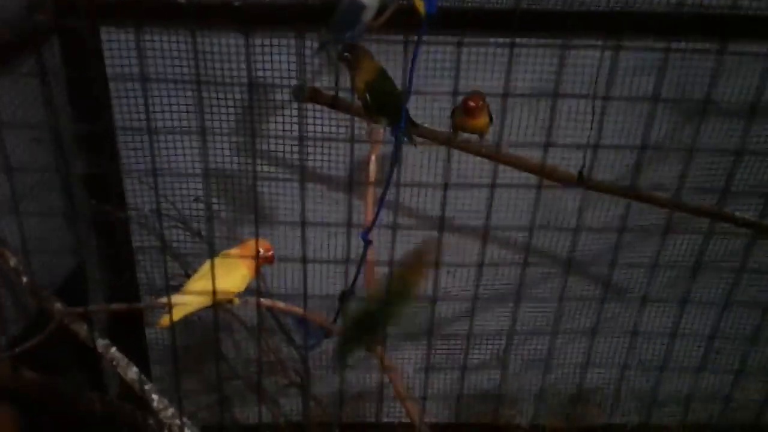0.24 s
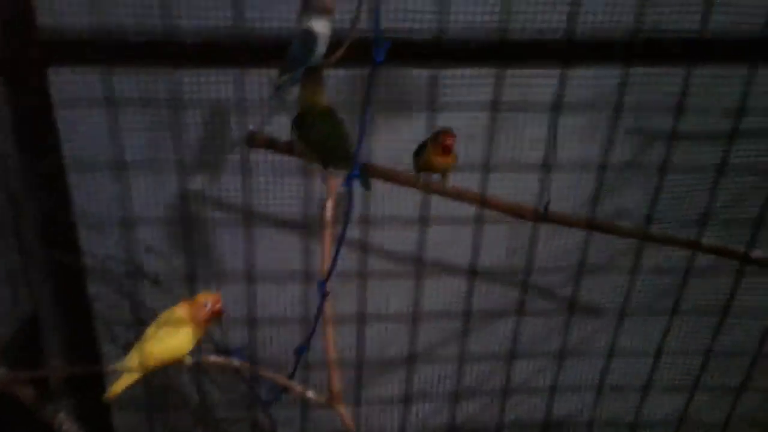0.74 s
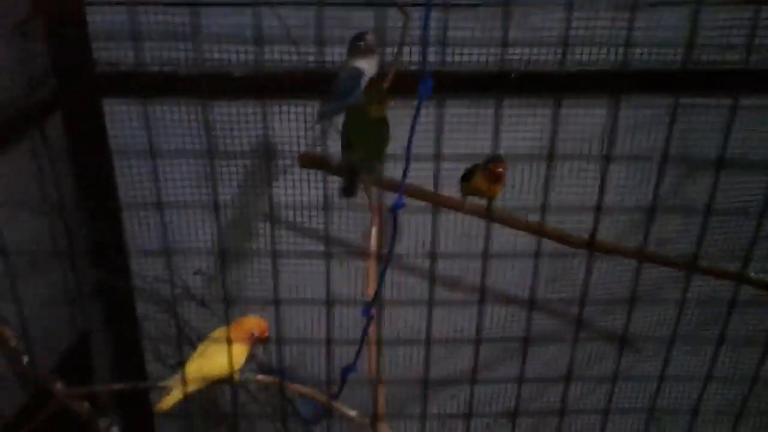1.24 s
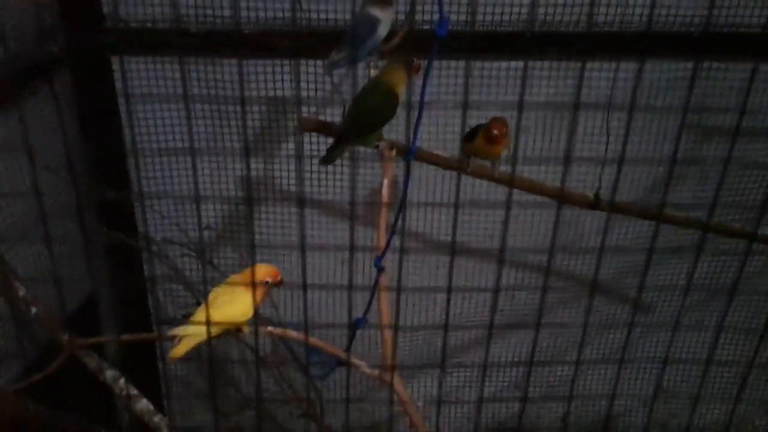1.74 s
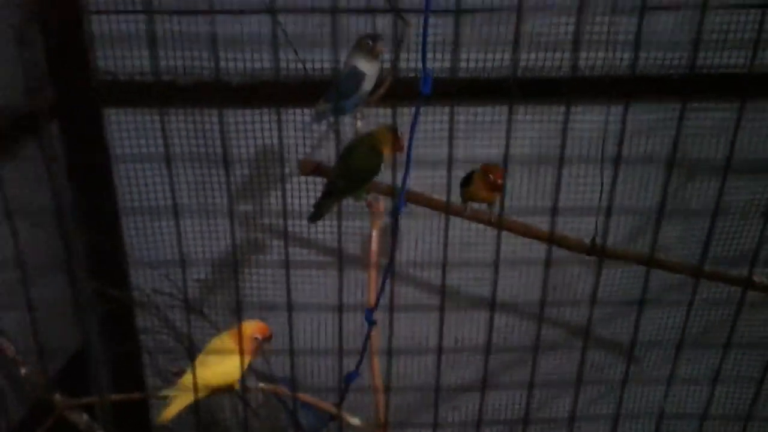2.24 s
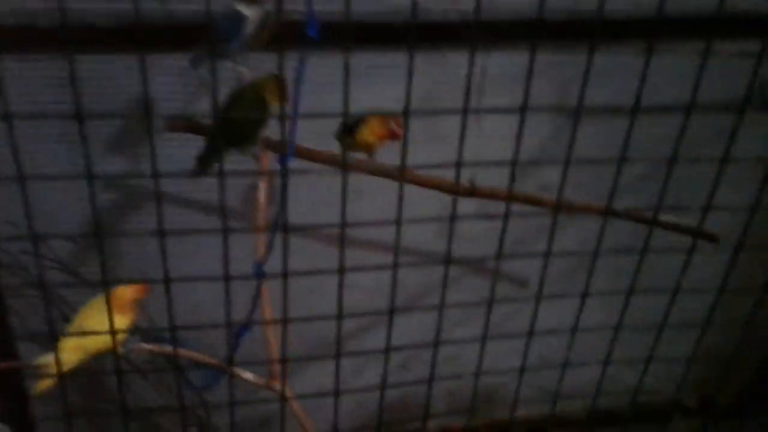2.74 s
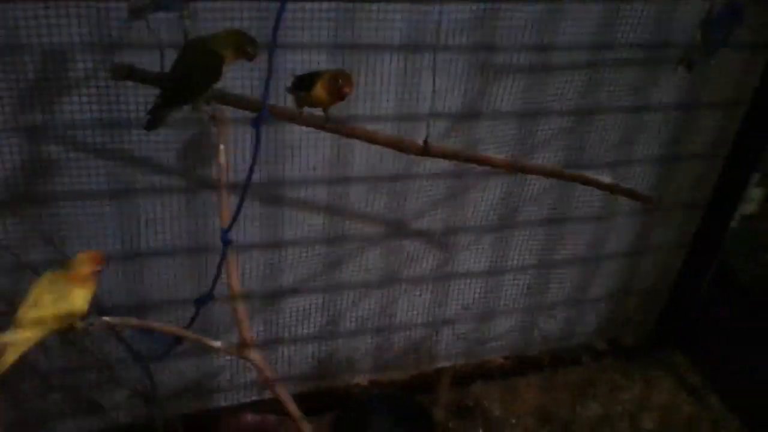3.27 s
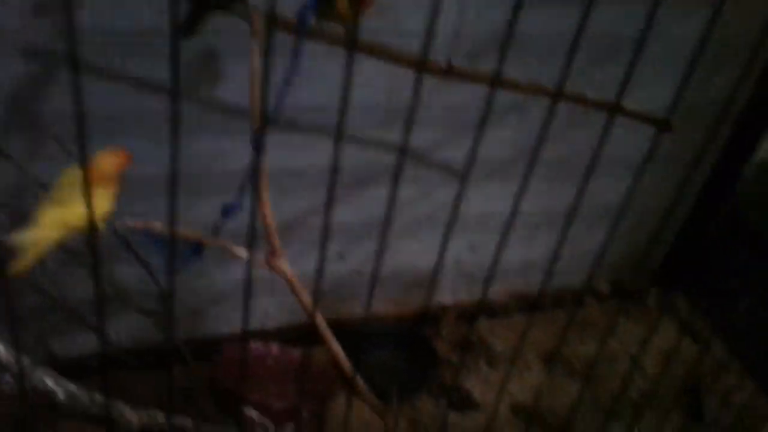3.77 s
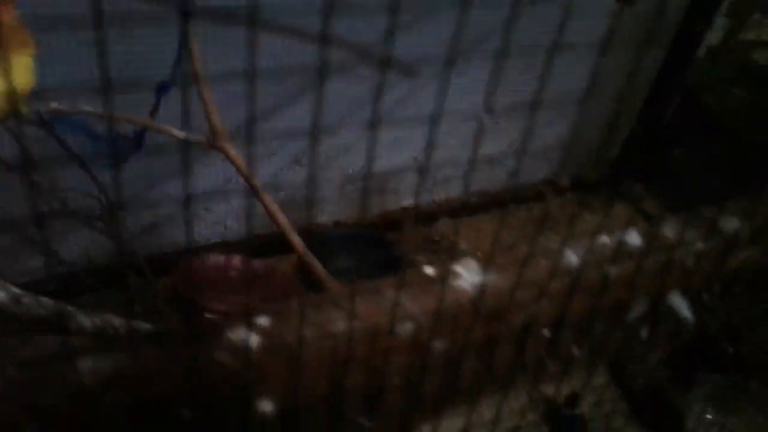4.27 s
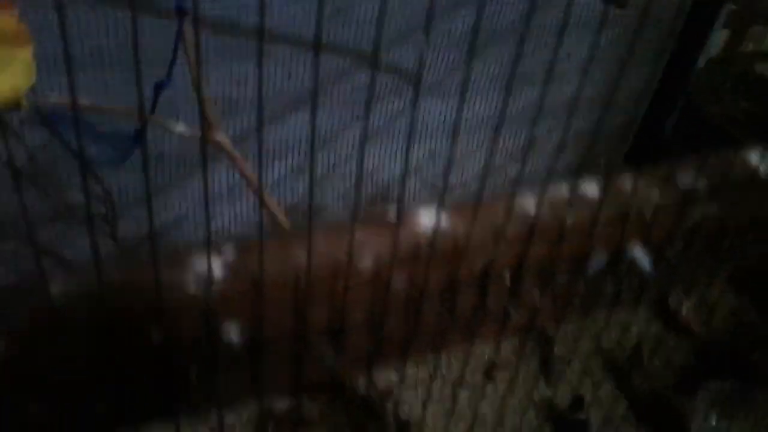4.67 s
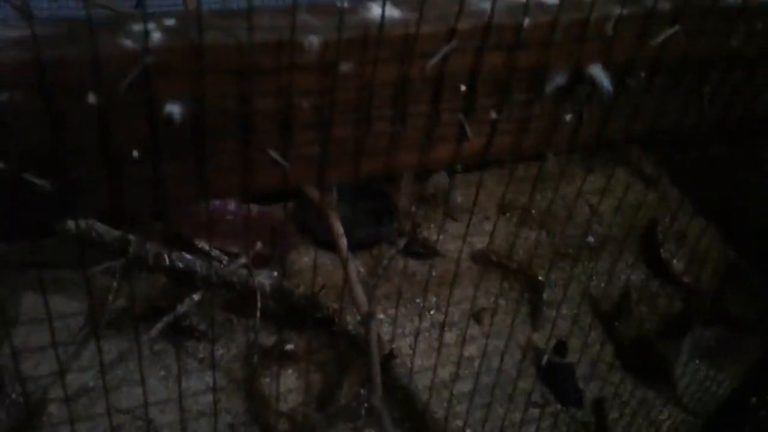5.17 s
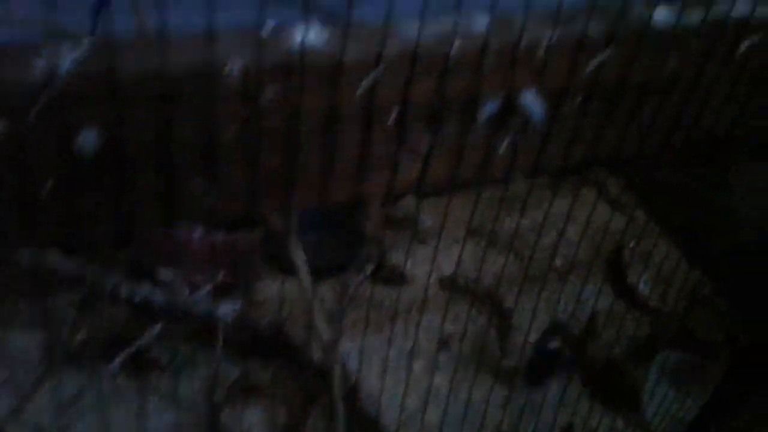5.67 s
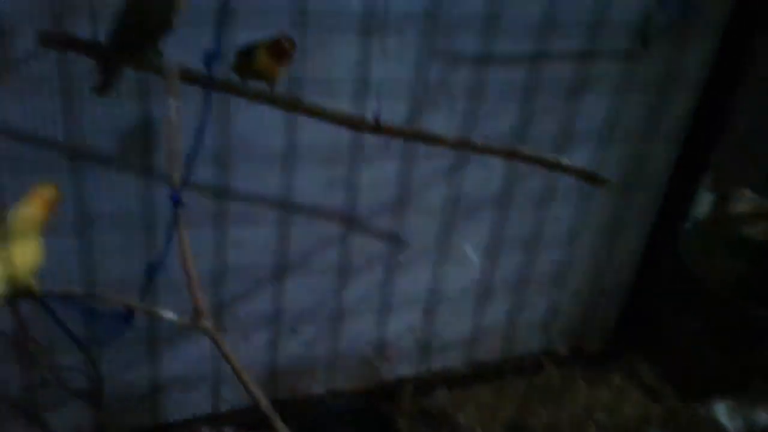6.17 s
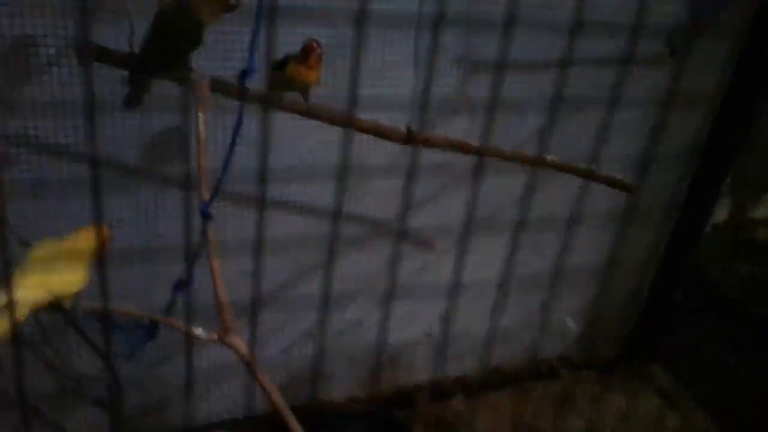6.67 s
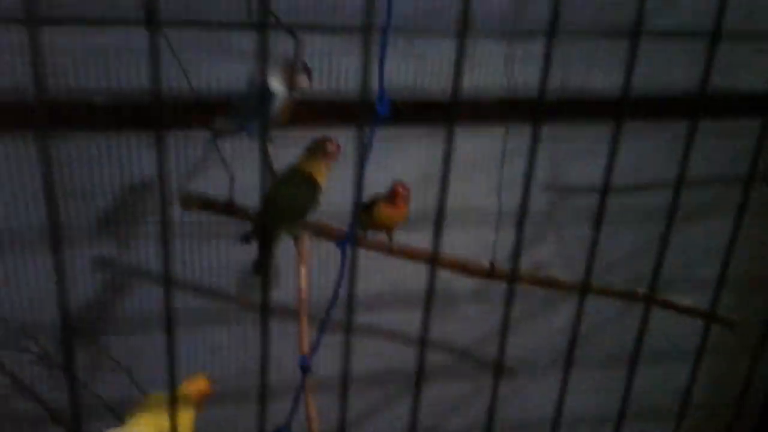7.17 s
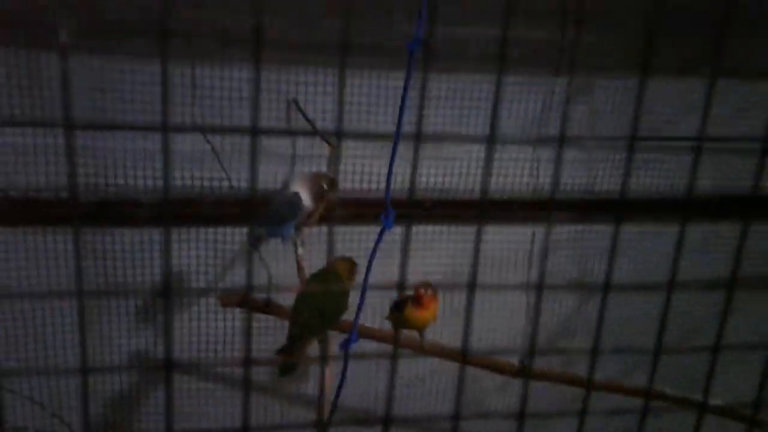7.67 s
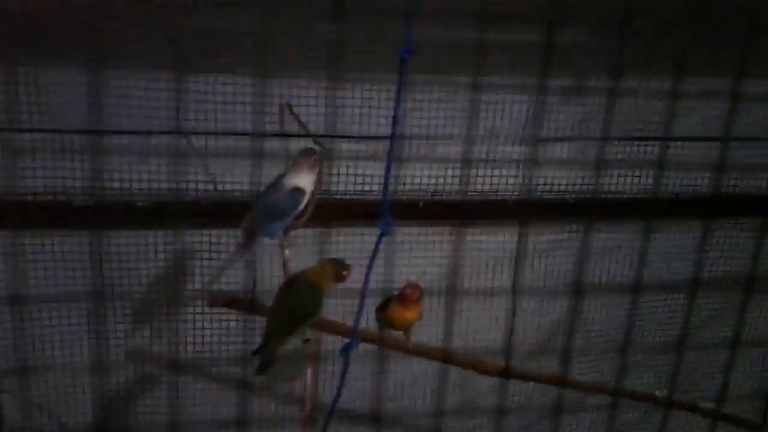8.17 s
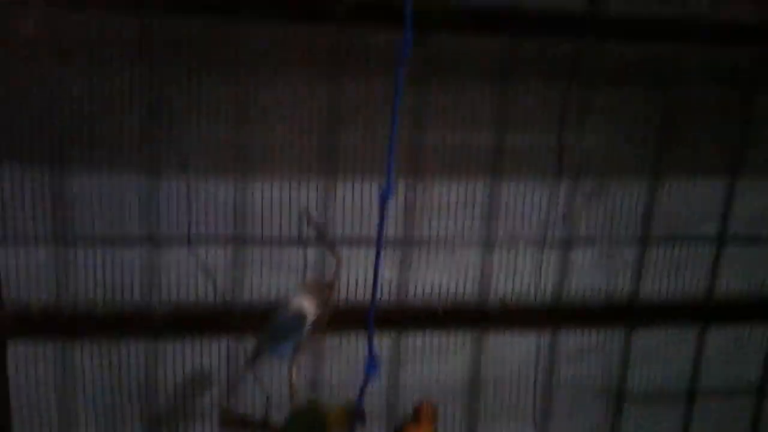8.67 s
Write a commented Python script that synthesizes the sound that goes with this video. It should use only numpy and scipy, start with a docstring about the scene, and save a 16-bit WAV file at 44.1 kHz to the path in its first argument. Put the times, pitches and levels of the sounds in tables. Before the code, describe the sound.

Shrill chatter from lovebirds gives way to spaced chirps, three rising screeches and a rush of twittering in an enclosure.

```python
"""A small roofed aviary: lovebirds give bits of chatter, sharp contact chirps, three rising screeches,
then a rush of chatter. Each note is a gliding, more or less rough syrinx tone shaped by one throat;
the enclosure rings briefly after it. Wings flurry and feet tap on perches and wire, over outdoor air
and a faint far hum. There is one dull thump; the loudest notes pop and overload the microphone a little."""
import sys
import numpy as np
from scipy import signal
from scipy.fft import rfft, irfft, next_fast_len
from scipy.io import wavfile
from scipy.ndimage import uniform_filter1d, minimum_filter1d

SR = 44100
rng = np.random.default_rng(int(sys.argv[2]) if len(sys.argv) > 2 else 0)


def bounce(signal):
    """Save signal as a 16-bit WAV file at the path given by the first command-line argument."""
    frames = np.transpose(np.atleast_2d(signal))
    limited = np.clip(frames, -1, 1)
    pcm = np.round(limited * 32767).astype(np.int16)
    wavfile.write(sys.argv[1], SR, pcm)


N = 392931
TIME_S = np.arange(N) / SR

# Spectra. Each row: frequency in Hz, relative level in dB.
AIR_SPECTRUM = [(20, -36), (45, -21), (90, -6), (170, 0), (300, 1.5), (500, -2), (800, -8.5), (2000, -8),
                (4500, -14.5), (8000, -20), (15000, -21.5), (15700, -16.5), (17000, -65)]
WING_SPECTRUM = [(25, -23.5), (80, -3.5), (170, -6.5), (500, -13), (1300, -12.5), (8000, -25)]
TAP_SPECTRUM = [(80, -14.5), (230, 9.5), (600, 1.5), (1200, 2), (2200, -3), (5000, -9.5), (9000, -19),
                (15000, -20)]
POP_SPECTRUM = [(30, -40), (130, 0), (260, -9.5), (700, -17.5), (2000, -16), (6000, -33)]
THUMP_SPECTRUM = [(30, -28), (100, -5.5), (230, 3.5), (420, -2.5), (800, -11.5), (2000, -22), (6000, -57)]
THROAT_SPECTRUM = [(1200, -15), (1800, -15), (2400, -5), (3100, 2), (4000, 6), (5000, 9), (6400, 8),
                   (7200, -11), (8500, -5.5), (10500, -14.5), (12300, -3), (14000, -30), (15700, -11.5),
                   (19000, -52)]
OVERLOAD_SPECTRUM = [(20, -25), (60, -12.5), (200, 0.5), (600, 7), (1500, 8.5), (4000, -27), (12000, -41.5)]

# Wing flurries. Each row: centre in seconds, spread in seconds, level in dB.
FLURRIES = [(.68, .19, -52), (6.12, .3, -60), (7.92, .18, -58)]
# Knocks. Each row: start in seconds, peak in dB.
TAPS = [(.565, -48), (1.262, -35), (1.30, -39), (1.388, -39), (1.573, -46.5), (2.255, -42.5),
        (3.203, -46.5), (5.125, -44.5), (5.243, -44.5), (6.045, -42), (6.098, -40.5)]  # feet and beaks on perches and wire
POPS = [(4.24, -33), (4.255, -24.5), (4.757, -22), (4.865, -20), (5.445, -30.5), (6.29, -28.5),
        (6.84, -21.5), (6.868, -21), (8.005, -18)]  # low, under the loudest notes
THUMPS = [(3.484, -18)]  # dull, close to the microphone

# Far calls. Each row: start and length in seconds, pitch in Hz, level in dB before distance, roughness.
FAR_CALLS = [(2.153, 0.052, 5420, -51, 0.22), (2.321, 0.19, 2828, -39.5, 1.23),
             (2.51, .053, 2673, -35.5, .6), (2.551, 0.063, 4480, -35.5, 0.87)]
# Peeps. Each row: start and length in seconds, level in dB.
PEEPS = [(0.215, 0.089, -35.5), (0.334, 0.12, -41), (0.497, 0.092, -37.5), (.565, 0.059, -46),
         (0.714, 0.074, -42)]
# Whistles. Each row: start and length in seconds, pitch in Hz, glide in octaves, level in dB.
WHISTLES = [ (0, 0.045, 3914, -.15, -19), (0.028, 0.045, 2620, 0.047, -25),
            (0.103, 0.079, 3484, 0.42, -25.5), (.148, 0.017, 4800, 0.28, -16.5),
            (0.766, 0.022, 2620, 0.45, -16.5), (0.813, 0.042, 3960, -0.41, -19),
            (0.94, .034, 4240, .4, -21), (0.978, 0.0078, 5026, 0.16, -9.5), (1.774, 0.013, 1971, 0.21, -18),
            (5.323, 0.012, 2027, -.03, -28), (6.673, 0.021, 4550, -0.054, -18.5),
            (6.722, 0.016, 4850, 0, -16.5), (6.862, .024, 5700, 0.25, -16),
            (6.947, 0.02, 3434, -0.033, -23), (6.966, 0.011, 3363, -0.13, -22.5),
            (7.229, 0.035, 4245, 0.022, -12.5), (7.265, 0.011, 6605, 0.14, -6),
            (7.282, 0.031, 5060, -0.44, -13.5), (7.354, 0.032, 3625, 0.44, -20.5),
            (7.639, 0.024, 4985, -0.18, -15.5), (7.774, 0.011, 5560, 0.35, -10),
            (7.785, 0.022, 3102, 0.095, -5.5), (7.838, 0.018, 4540, -0.47, -15),
            (7.879, .02, 5180, 0.47, -12.5), (7.958, 0.033, 4103, 0.295, -17.5),
            (7.99, .02, 5500, 0.497, -7.5), (8.027, 0.04, 3677, -0.34, -18),
            (8.107, 0.027, 4250, 0.064, -19.5), (8.127, 0.03, 5580, 0.5, -14.5),
            (8.289, 0.023, 4840, 0.12, -16.5), (8.312, 0.011, 3740, -0.032, -15.5),
            (8.337, 0.026, 3560, -0.17, -15.5), (8.399, 0.024, 4880, -0.31, -18),
            (8.553, 0.019, 6070, 0.46, -20), (8.629, 0.031, 3970, -0.55, -17.5),
            (8.813, 0.025, 3865, 0.6, -20.5), (8.846, 0.0205, 2910, .22, -18.5)]
# Rough syllables. Each row: start and length in seconds, pitch in Hz, level in dB.
CROAKS = [(0.077, 0.038, 2166, -31.5), (0.748, 0.017, 2296, -24.5), (6.936, 0.016, 2100, -32),
          (7.201, 0.032, 2402, -19), (7.481, 0.05, 1953, -28), (7.595, 0.064, 1967, -27),
          (7.765, 0.0093, 2267, -20.5), (8.241, 0.029, 1978, -23.5), (8.268, 0.0214, 2168, -15),
          (8.4, 0.031, 1850, -41), (8.542, 0.025, 1800, -21), (8.66, 0.02, 1825, -18.5),
          (8.783, 0.024, 1820, -20.5)]
RASPS = [(0, .04, 3190, -25.5), (0.855, 0.018, 2900, -24.5), (0.963, .019, 3080, -24),
         (1.774, 0.0074, 2900, -15), (5.845, 0.012, 4430, -16.5), (6.299, .017, 4080, -17.5),
         (6.767, 0.041, 3956, -18), (6.80, .044, 3150, -11.5), (6.841, 0.018, 5080, -13.5),
         (7.322, 0.039, 2150, -26.5), (7.821, 0.0081, 3200, -11.5), (7.845, 0.0265, 3320, -12.5),
         (8.069, 0.049, 1800, -22.5), (8.357, 0.09, 2100, -25.5), (8.569, 0.051, 3130, -17),
         (8.676, 0.015, 3500, -19.5)]
# Swoops. Each row: start and dive length in seconds, dive and leap pitch in Hz, dive level in dB.
SWOOPS = [(7.385, 0.022, 3302, 4960, -16), (7.511, 0.024, 4285, 5100, -20.5),
          (8.143, 0.038, 3673, 5130, -18), (8.447, .027, 4360, 6150, -18.5), (8.688, .026, 4080, 5700, -20),
          (8.746, 0.033, 4220, 5200, -18.5)]
# Contact chirps. Each row: start and length in seconds, pitch in Hz, level in dB, roughness.
CHIRPS = [(2.404, 0.034, 3040, -15, 0.84), (2.976, 0.037, 3125, -9.5, 0.21), (3.455, 0.04, 3092, -14, 0.39),
          (3.56, 0.03, 3050, -12, 0.71), (4.011, 0.048, 3147, -16, 0.34), (4.171, .039, 3125, -15.5, 0.62),
          (4.217, 0.032, 2843, -10, 0.93), (4.727, 0.038, 3135, -12, 0.57), (4.809, 0.04, 3055, -13, 0.4),
          (4.854, 0.032, 3002, -8.5, 0.51), (5.405, 0.039, 2952, -13, .5)]
# Screeches. Each row: start and length in seconds, pitch approached in Hz, full level in dB.
SCREECHES = [(5.693, 0.17, 3290, -16.5), (6.141, 0.17, 3164, -15.5), (6.652, 0.13, 3187, -16.5)]


def undb(db):
    """Decibels to gain."""
    return 10 ** (np.asarray(db) / 20)


def unit(x):
    """Scale to rms 1."""
    return x / np.sqrt(np.mean(x ** 2) + 1e-18)


def even(x):
    """Hold the running rms at 1."""
    return x / np.sqrt(uniform_filter1d(x ** 2, size=1024) + 1e-12)


def response(spectrum, hz):
    """Gain of a spectrum at the given frequencies."""
    points_hz, db = np.transpose(spectrum)
    return undb(np.interp(np.log(hz + 1), np.log(points_hz), db))


def colour(x, spectrum):
    """Filter by a spectrum."""
    size = next_fast_len(len(x))
    hz = np.arange(size // 2 + 1) * SR / size
    return irfft(rfft(x, size) * response(spectrum, hz), size)[:len(x)]


def noise(spectrum):
    """Coloured noise, rms 1."""
    return unit(colour(rng.standard_normal(N), spectrum))


def wobble(hz):
    """Random motion up to the given rate, rms 1."""
    return unit(signal.sosfilt(signal.butter(4, hz, fs=SR, output="sos"), rng.standard_normal(N)))


def add(out, start_s, x):
    """Mix x in at start_s."""
    i = max(int(start_s * SR), 0)
    out[i:i + len(x)] += x[:max(N - i, 0)]


def outdoor_air(level_db=-62.5, swell_db=2.5):
    """Gently swelling background noise."""
    return noise(AIR_SPECTRUM) * undb(level_db + swell_db * wobble(0.67))


def far_hum(start_s=1.79, length_s=0.8, edge_s=0.07, sink_hz_per_s=95, fade_db_per_s=8):
    """A faint wavering tone that sinks and fades."""
    t = np.clip(TIME_S - start_s, 0, length_s)
    hz = (444 - sink_hz_per_s * t) * (1 + 0.0314 * wobble(36))
    db = -59 - fade_db_per_s * t + 3 * wobble(27)
    gate = np.minimum(np.minimum(t, length_s - t) / edge_s, 1)
    return np.sin(2 * np.pi * np.cumsum(hz) / SR) * gate * undb(db)


def wings(beat_hz=38):
    """Soft puffs of air at the wingbeat rate."""
    beats = np.sin(np.pi * beat_hz * TIME_S) ** 2 + 0.5
    effort = sum(undb(db) * np.exp(-((TIME_S - centre_s) / spread_s) ** 2)
                 for centre_s, spread_s, db in FLURRIES)
    return noise(WING_SPECTRUM) * beats * effort


def knocks(events, spectrum, decay_s, attack_s=0.00013):
    """Short dying noise bursts of one colour."""
    out = np.zeros(N)
    t = np.arange(SR // 8) / SR
    for start_s, peak_db in events:
        envelope = np.exp(-t / decay_s) * np.minimum(t / attack_s, 1)
        burst = colour(rng.standard_normal(len(t)), spectrum) * envelope
        add(out, start_s, burst * undb(peak_db) / np.abs(burst).max())
    return out


def aviary(x, early_db, tail_db, t60_s, treble_t60_s, block=16384):
    """Direct sound, sparse early reflections, then a tail whose treble dies sooner."""
    t = np.arange(SR // 2) / SR
    lowpass, highpass = (signal.butter(2, 7500, kind, fs=SR, output="sos") for kind in ("low", "high"))
    window = np.sqrt(np.hanning(block))
    out = x.copy()
    for i in range(0, N, block // 2):  # new echo pattern per block: birds and microphone move
        body, treble, early = rng.standard_normal((3, len(t)))
        body = signal.sosfilt(lowpass, body) * undb(-60 * t / t60_s)
        treble = signal.sosfilt(highpass, treble) * undb(-60 * t / treble_t60_s)
        tail = (body + treble) * np.minimum(t / 0.0066, 1)
        early *= (rng.random(len(t)) < 0.01) * np.exp(-t / 0.0079) * (t > 0.001)
        echo = (undb(early_db) * unit(early) + undb(tail_db) * unit(tail)) / np.sqrt(len(t))
        piece = x[i:i + block]
        add(out, i / SR, signal.fftconvolve(piece * window[:len(piece)], echo))
    return out


def syrinx(notes, jitter, jitter_hz, shimmer, hiss, tilt_db_per_oct, attack_s, release_s, softening=0):
    """Rough notes shake in pitch and break into pulses; the throat weights their harmonics."""
    out = np.zeros(N)
    shake, flutter = wobble(jitter_hz), wobble(330)
    quaver = 0.007 * wobble(130)
    gape = np.exp(0.032 * wobble(60))  # the moving beak shifts the resonances
    breath = noise(THROAT_SPECTRUM)
    harmonic = np.arange(1, 9)[:, None]
    for start_s, *curves in notes:
        pitch_hz, db, rough = (np.pad(curve, (0, int(release_s * SR)), "edge") for curve in curves)
        t = np.arange(len(pitch_hz)) / SR
        at = (int(start_s * SR) + np.arange(len(t))) % N
        depth = jitter * rough * np.minimum(pitch_hz / 2500, 1) ** 2  # high notes shake more
        hz = pitch_hz * np.exp(depth * shake[at] + quaver[at])
        slope_db_per_oct = tilt_db_per_oct + softening * np.minimum(db + 0.5, 0)  # soft notes are purer
        source = undb(slope_db_per_oct * np.log2(harmonic)) * (harmonic * hz < SR / 2)
        weights = source * response(THROAT_SPECTRUM, harmonic * hz * gape[at])
        phase = 2 * np.pi * np.cumsum(hz) / SR
        tone = even(np.sum(weights * np.sin(harmonic * phase), axis=0))
        pulses = np.exp(shimmer * rough * np.tanh(flutter[at]))
        voice = even((tone + hiss * rough ** 2 * breath[at]) * pulses)
        ramps = np.clip(t / attack_s, 0, 1) * np.clip((t[-1] - t) / (2 * release_s), 0, 1)
        add(out, start_s, voice * np.sin(np.pi / 2 * ramps) ** 2 * undb(db))
    return out


def slur(start_s, length_s, hz, db, rough, glide_oct, swell_db=0, arch_db=3):
    """One note's curves: pitch glides fast, passes hz halfway and settles; pressure arches."""
    progress = np.linspace(0, 1, int(length_s * SR))
    pitch_hz = hz * 2 ** (glide_oct * (0.25 - (1 - progress) ** 2))
    arch = (2 * progress - 1) ** 2
    level_db = db - arch_db * (arch - arch.mean()) - swell_db * np.maximum(1 - 2 * progress, 0)
    return start_s, pitch_hz, level_db, np.full(len(progress), rough)


def far_calls():
    """Falling calls of birds at the far end."""
    notes = [slur(*row, glide_oct=-0.12, swell_db=-4.5) for row in FAR_CALLS]
    return syrinx(notes, jitter=0.15, jitter_hz=620, shimmer=0.45, hiss=0.34,
                  tilt_db_per_oct=-3.5, attack_s=0.013, release_s=0.0055)


def peeps(hz=2900):
    """Thin bright notes on one pitch."""
    notes = [slur(start_s, length_s, hz, db, rough=0.18, glide_oct=-0.03, swell_db=4.5)
             for start_s, length_s, db in PEEPS]
    return syrinx(notes, jitter=0.053, jitter_hz=310, shimmer=3.5, hiss=0.2,
                  tilt_db_per_oct=4, attack_s=0.0021, release_s=0.0056)


def chatter(leap_s=0.02013):
    """Quick whistles, low rising croaks, harsh sagging rasps and swoops that dive, then leap."""
    notes = []
    for start_s, length_s, hz, glide_oct, db in WHISTLES:
        rough = 0.15 + 0.65 * max(glide_oct, 0)  # rougher when pushed upwards
        notes.append(slur(start_s, length_s, hz, db, rough, glide_oct))
    notes += [slur(*row, rough=0.78, glide_oct=0.4) for row in CROAKS]
    notes += [slur(*row, rough=0.99, glide_oct=-0.15) for row in RASPS]
    for start_s, dive_s, dive_hz, leap_hz, db in SWOOPS:
        notes.append(slur(start_s, dive_s, dive_hz, db, rough=0.33, glide_oct=-0.59))
        notes.append(slur(start_s + dive_s, leap_s, leap_hz, db + 4, rough=0.33, glide_oct=0.241))
    return syrinx(notes, jitter=0.11, jitter_hz=450, shimmer=1.15, hiss=0.28,
                  tilt_db_per_oct=5, attack_s=0.005, release_s=0.0035, softening=0.38)


def chirps(flick_oct=0.17, flick_s=0.0064):
    """Shrill swelling contact notes; each starts high and drops onto its pitch."""
    notes = []
    for row in CHIRPS:
        start_s, hz, db, rough = slur(*row, glide_oct=-0.018, swell_db=11.5)
        t = np.arange(len(hz)) / SR
        flick = 2 ** (flick_oct * np.exp(-t / flick_s))
        notes.append((start_s, hz * flick, db, rough))
    return syrinx(notes, jitter=0.085, jitter_hz=450, shimmer=1.1, hiss=0.13,
                  tilt_db_per_oct=2, attack_s=0.0025, release_s=0.015)


def screeches(start_hz=1590, climb_s=0.113, swell_db=23, swell_s=0.028, rough_per_s=2.2):
    """Long notes under rising pressure: pitch and level climb and flatten, roughness grows in fits."""
    notes = []
    for start_s, length_s, top_hz, full_db in SCREECHES:
        t = np.arange(int(length_s * SR)) / SR
        hz = top_hz + (start_hz - top_hz) * np.exp(-t / climb_s)
        db = full_db - swell_db * np.exp(-t / swell_s)
        fits = np.exp(0.12 * wobble(45)[-len(t):])
        notes.append((start_s, hz, db, (0.335 + rough_per_s * t) * fits))
    return syrinx(notes, jitter=0.11, jitter_hz=560, shimmer=1.6, hiss=0.6,
                  tilt_db_per_oct=9.5, attack_s=0.005, release_s=0.0027, softening=0.64)


def scene(distance_db=-4.5):
    """Near birds are mostly direct sound, far ones mostly reflections."""
    near = peeps()
    far = far_calls() * undb(distance_db)
    near += knocks(TAPS, TAP_SPECTRUM, decay_s=0.026)
    near += chatter() + chirps() + screeches()
    near = aviary(near, early_db=-4, tail_db=-6, t60_s=0.42, treble_t60_s=0.28)
    far = aviary(far, early_db=7, tail_db=2.5, t60_s=0.53, treble_t60_s=0.04)
    pops = knocks(POPS, POP_SPECTRUM, decay_s=0.0043)
    thump = knocks(THUMPS, THUMP_SPECTRUM, decay_s=0.0052)
    return (near + far + pops + thump + wings() + outdoor_air() + far_hum())[None]


def record(dry, knee=0.11, crackle_gain_db=-20, ceiling=0.74, cutoff_hz=15800):
    """One-sided microphone overload adds low crackle; a fast limiter holds peaks; the top is cut."""
    x = dry[0]
    crackle = colour(np.maximum(x - knee, 0) ** 2, OVERLOAD_SPECTRUM) * undb(crackle_gain_db)
    gain = 1 / np.sqrt(1 + (x / ceiling) ** 4)
    smooth_gain = uniform_filter1d(minimum_filter1d(gain, size=64), size=64)
    lowpass = signal.ellip(8, 0.2, 70, cutoff_hz, fs=SR, output="sos")
    return signal.sosfilt(lowpass, x * smooth_gain + crackle)[None]


dry = scene()
out = record(dry)
bounce(out)
```